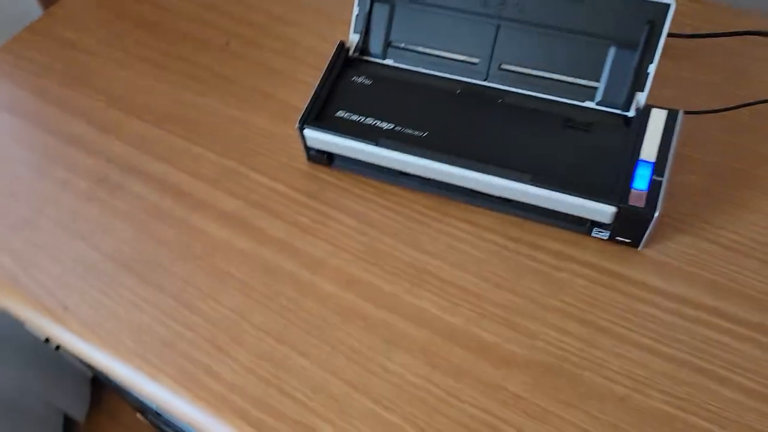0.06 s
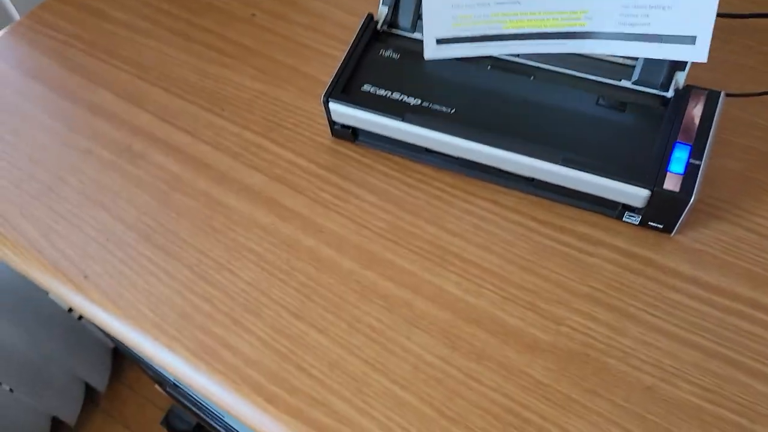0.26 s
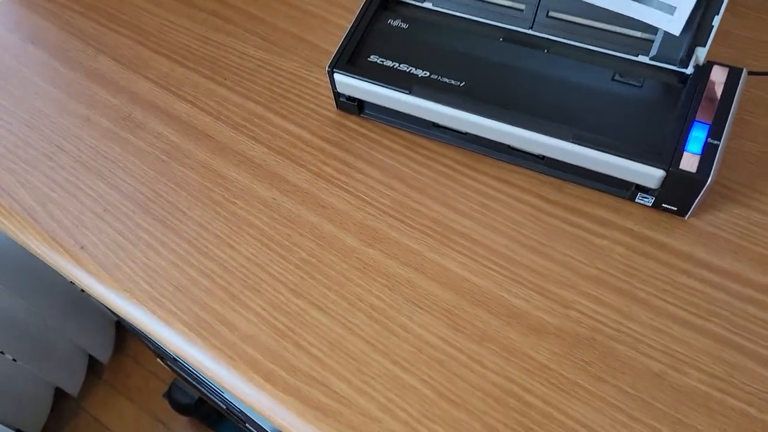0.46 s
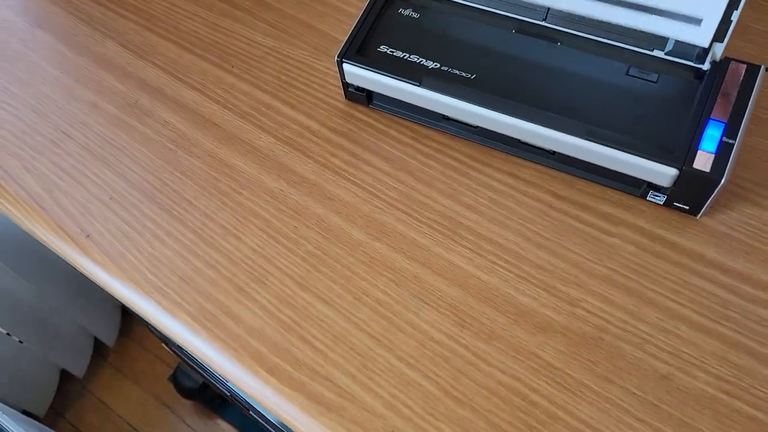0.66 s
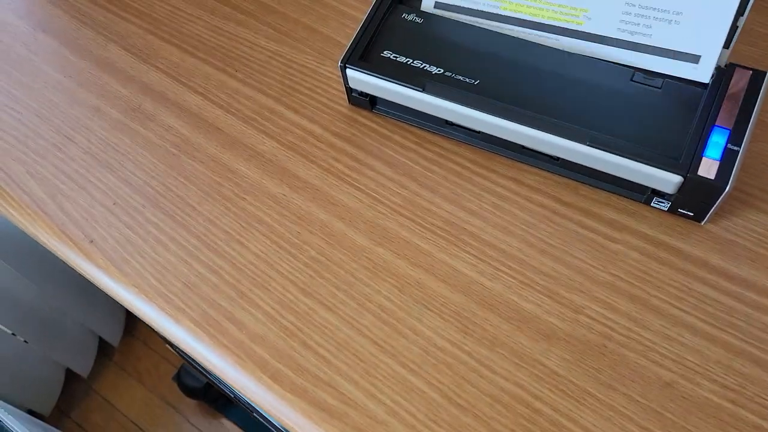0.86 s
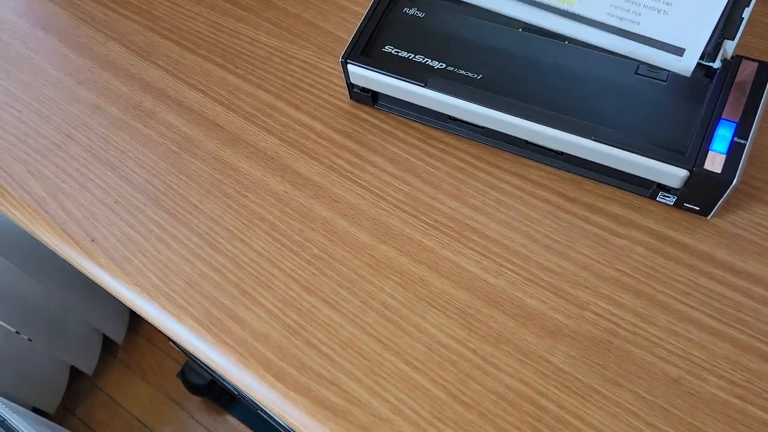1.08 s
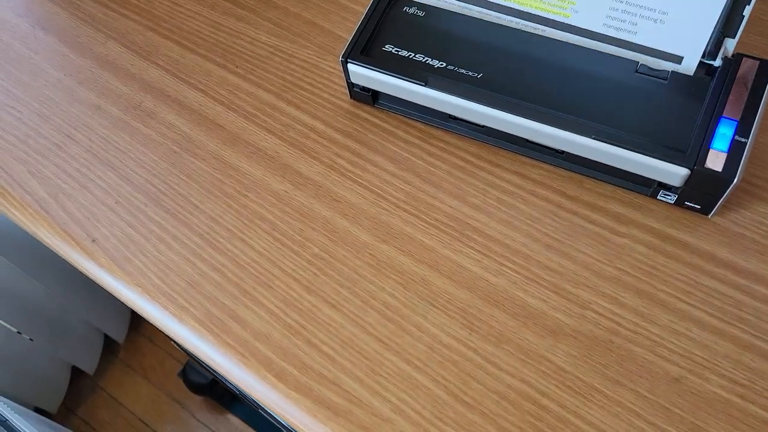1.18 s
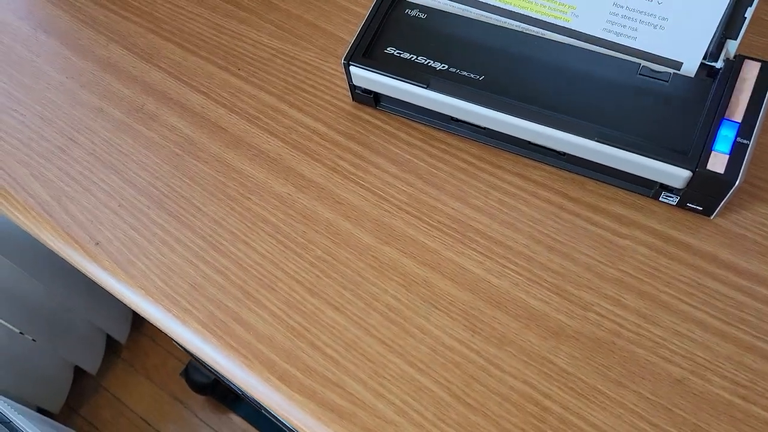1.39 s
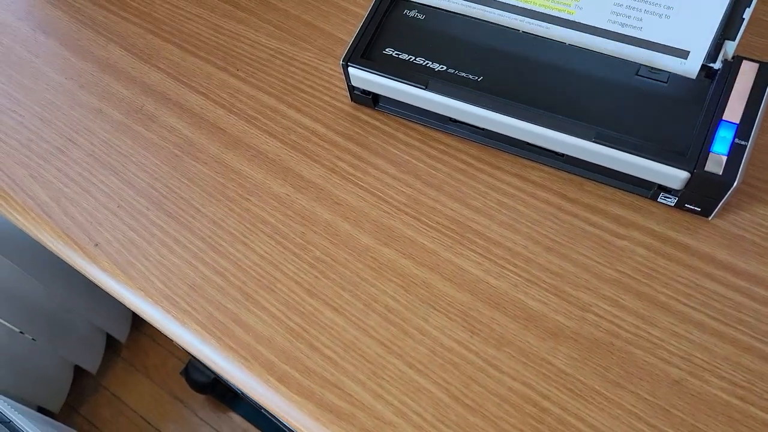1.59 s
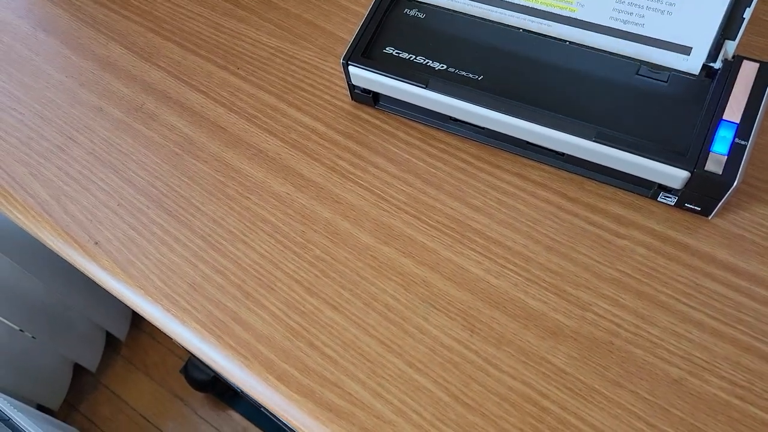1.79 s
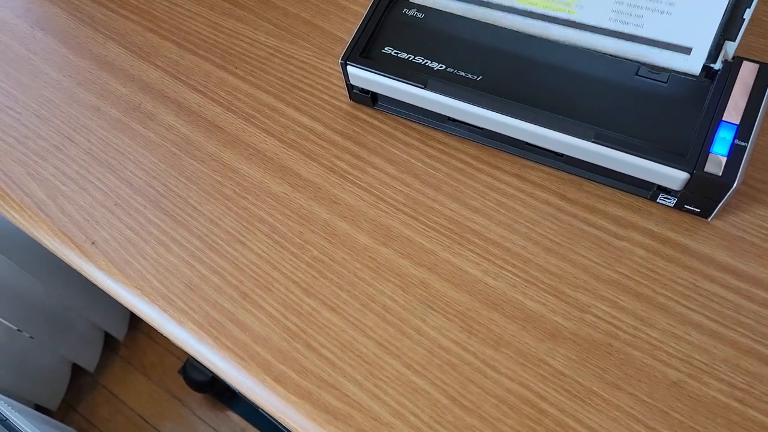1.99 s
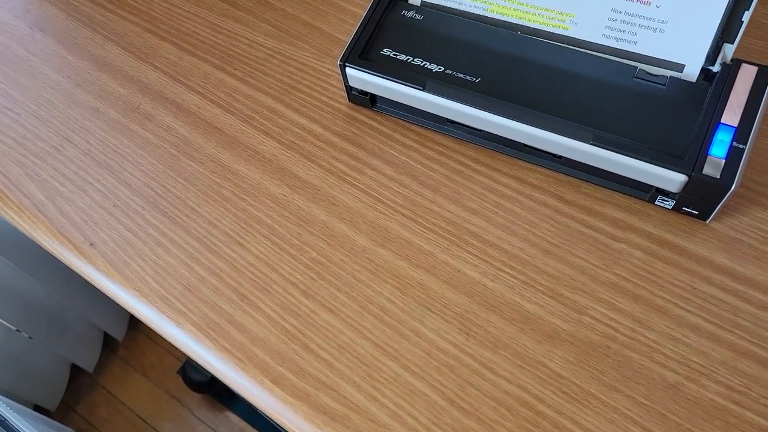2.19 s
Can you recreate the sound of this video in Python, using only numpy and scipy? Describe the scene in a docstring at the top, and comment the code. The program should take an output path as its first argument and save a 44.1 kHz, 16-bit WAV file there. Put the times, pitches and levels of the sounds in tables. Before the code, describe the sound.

Paper sheets are loaded into a scanner's hollow plastic tray, close up in stereo. Faint rubbing over low room rumble, then from 0.2 to 0.45 seconds a brisk scrape and hard clack, loudest near 0.3. Soft rustling and small ticks follow until a crisp papery knock at 1.25. A faint scrape comes around 1.6 to 1.7, then near quiet, with a slight rustle about 2.1.

```python
"""A low rumble and the faint rub of paper come first, in a quiet room before two microphones.
Then a hand drops sheets into the plastic feeder tray of a desk scanner: the stack knocks and scrapes.
Knocks and drag excite decaying modes of the hollow tray; filtered noise makes the paper's snap.
The sheets slide as hiss with fine crackle, delay loops give the room, steady noise the rumble."""
import sys
import numpy as np
from scipy import signal
from scipy.io import wavfile

SR = 44100
rng = np.random.default_rng(int(sys.argv[2]) if len(sys.argv) > 2 else 0)


def generate_wav(signal):
    """Clip the signal to [-1, 1] and save it as 16-bit WAV at the path in sys.argv[1]."""
    frames = np.transpose(np.atleast_2d(signal))
    scaled = np.clip(frames, -1, 1) * 32767
    pcm = np.round(scaled).astype(np.int16)
    wavfile.write(sys.argv[1], SR, pcm)


def boost(x):
    """Linear amplitude factor 10**(x/20) for a level x in decibels (scalar or array-like)."""
    u = np.asarray(x, float) / 20
    return 10 ** u


N = 99225  # samples, 2.25 s

# Modes of the plastic tray. Each row: frequency in Hz, relative level in dB, t60 in seconds.
TRAY_MODES = [(691, -5, 0.058), (850.4, -0.5, 0.02), (1035.4, -9.5, 0.077), (1162, -7.5, 0.071),
              (1349, 1.5, 0.019), (1555.4, 1, 0.03), (1744, 1.5, 0.045), (2103, -5, .03),
              (2386, -3.5, 0.023), (2833, -1, 0.0325), (3196, 3, 0.018), (3863, 7, 0.0067)]
# Modes of hollow body and desk. Each row: frequency in Hz, relative level in dB, t60 in seconds.
BODY_MODES = [(135.9, -4, 0.029), (181, -15, 0.06), (223, -5, 0.064), (353, -7.5, 0.079),
              (444.5, -5.5, 0.076), (578, -7, 0.063)]
# Colour of snapping paper, also of the scrape's hiss. Each row: frequency in Hz, relative level in dB per Hz.
SNAP_SPECTRUM = [(410, -28.5), (700, -6.5), (1750, -9), (2220, 1.5), (4150, -23.5), (4730, -3.5),
                 (6480, -24.5), (7790, -21), (11200, -37.5), (16000, -33)]


def knocks():
    """Each knock rings the tray and the body under it, and the paper snaps as a burst of coloured noise."""
    tray_force = blows(column=1, rows=len(TRAY_MODES), alike=0.53)
    tray = boost(-8.5) * low_cut(ring(tray_force, TRAY_MODES), hz=150, order=1)
    body_force = blows(column=3, rows=len(BODY_MODES), alike=1)
    thud = boost(-5) * low_cut(ring(body_force, BODY_MODES), hz=63, order=2)
    left, right = blows(column=2, rows=1, alike=0.53)[0]
    mid_side = np.array([left + right, left - right]) / 2
    snap = boost(17) * coloured(mid_side, SNAP_SPECTRUM, patchy_db=0)
    return ears(tray + thud) + snap


# Knocks of the stack on the tray. Each row: start in seconds, then relative levels in dB of tray ring,
# paper snap and thud, rattle under the click in dB (held to -10 at most), rattle t60 in seconds (0.2 at most).
KNOCK_ROWS = [(0.1824, -37, -52, -48, -13, 0.028), (0.2617, -17, -22, -57, -22, 0.055),
              (0.3132, -26, -30, -25, -15.5, 0.09), (0.321, -8.5, -14.5, -17.5, -26.5, 0.17),
              (0.4433, -36, -50, -37, -26, 0.01), (0.452, -31, -36.5, -40, -8.5, 0.091),
              (0.532, -44, -62, -49.5, -9.5, 0.099), (0.839, -47, -45.5, -50, -13.5, 0.039),
              (0.8465, -41, -51, -47.5, -8.5, 0.04), (0.895, -50, -51, -42, -10.5, 0.042),
              (0.918, -40, -33, -46, -15.5, 0.11), (1.0638, -38.5, -45.5, -45, -16.5, 0.02),
              (1.2008, -34, -24.5, -41.5, -24, 0.11), (1.2273, -29, -44, -44.5, -12, 0.18),
              (1.2454, -16.5, -9.5, -30, -31, 0.08), (1.5745, -55.5, -44.5, -55, -20.5, 0.08),
              (1.604, -46, -43, -41, -23, 0.047), (1.612, -50, -45.5, -57, -24, 0.023),
              (1.648, -54, -41, -45, -21, 0.031), (1.669, -69, -66, -50, -10, 0.23),
              (2.129, -48.5, -50.5, -53, -5, 0.2), (2.144, -56, -42, -45, -16, 0.14)]


def blows(column, rows, alike):
    """Forces of the knocks: a click, a short crack and a dying rattle of noise, scattered in strength."""
    crack_db, crack_t60_s = -9, 0.003
    mode_scatter_db, side_scatter_db = 2.5, 1.5
    out = np.zeros((rows, 2, N + SR))
    t = np.arange(SR // 6) / SR
    for knock in KNOCK_ROWS:
        start_s, rattle_db, rattle_t60_s = knock[0], min(knock[4], -10), np.clip(knock[5], 0.004, 0.2)
        noise = rng.standard_normal((2, len(t)))
        noise[1] = alike * noise[0] + np.sqrt(1 - alike ** 2) * noise[1]
        rattle = boost(rattle_db - 60 * t / rattle_t60_s)
        crack = boost(crack_db - 60 * t / crack_t60_s)
        force = (rattle + crack) * noise
        force[:, 0] = 1  # the click
        scatter = side_scatter_db * rng.standard_normal((rows, 2, 1))
        if rows > 1:
            scatter = scatter + mode_scatter_db * rng.standard_normal((rows, 1, 1))
        i = int(start_s * SR)
        out[..., i:i + len(t)] += force * boost(knock[column] + scatter)
    return out[..., :N]


# Strokes of the stack's edge along the tray, one list a stroke.
# Each row: time in seconds, relative level of the tray in dB, relative level of the body under it in dB.
SCRAPE_STROKES = [
    [(0.17, -53.5, -68), (0.184, -38, -47), (0.194, -39.5, -49.5), (0.214, -25.5, -35), (0.228, -22, -46),
     (0.244, -26.5, -41), (0.262, -21.5, -35.5), (0.294, -34, -42), (0.31, -53, -31)],
    [(0.335, -20.5, -30.5), (0.361, -37, -49), (0.383, -28.5, -36.5), (0.419, -52, -50), (0.44, -52, -35.5)],
    [(1.255, -33, -30), (1.273, -48, -37), (1.305, -73, -50), (1.347, -55.5, -50), (1.42, -70, -73)],
    [(1.59, -59, -60.5), (1.614, -42.5, -45), (1.642, -51, -56), (1.648, -47.5, -64), (1.672, -53, -48),
     (1.698, -52, -53.5), (1.728, -60, -55), (1.776, -69.5, -63), (1.8, -81, -70.5)],
]
# Resonances that the dragged edge brings out. Each row: frequency in Hz, relative level in dB, t60 in seconds.
DRAGGED_MODES = [(620, -15, 0.016), (749, -8, 0.012), (1001, -4.5, 0.017), (1094, -3, 0.036),
                 (1210, -4, 0.019), (1414, -3, 0.011), (1760, -0.5, 0.0067), (2115, -5, 0.014),
                 (2570, -7, .015), (3276, -10, 0.0093)]
# Body resonances under the drag. Each row: frequency in Hz, relative level in dB, t60 in seconds.
HOLLOW_MODES = [(321, 0.5, .07), (410, 0.5, 0.047)]


def scrape():
    """Dense slips of the paper edge drive the resonances of tray and body."""
    # silent outside the strokes
    tray_level, body_level = sum(boost(np.array(in_time(rows, -200))) for rows in SCRAPE_STROKES)
    slips = grains(per_s=4000, spread_db=2.5)
    slips[1] = 0.82 * slips[0] + 0.656 * slips[1]  # partly alike on both sides
    tray = rms_one(low_cut(ring([slips] * len(DRAGGED_MODES), DRAGGED_MODES), hz=450, order=4))
    body = rms_one(low_cut(ring([slips] * len(HOLLOW_MODES), HOLLOW_MODES), hz=230, order=4))
    hiss = boost(-23.5) * rms_one(coloured(slips, SNAP_SPECTRUM, patchy_db=0))
    judder = boost(1.5 * drift(rate_hz=60))
    return judder * (ears(tray_level * tray + body_level * body) + tray_level * hiss)


# Sheets sliding on each other. Each row: time in seconds, level of the rub in dB, level of its treble band in dB.
SLIDE_LEVELS = [(0.0, -71.5, -98), (0.035, -51, -69.5), (0.17, -57.5, -61), (0.21, -84, -73),
                (0.26, -32, -83), (0.3, -45, -51), (0.345, -51, -42), (0.39, -48, -68), (0.44, -44, -50.5),
                (0.48, -60, -56.5), (0.51, -47, -68), (0.54, -48.5, -52), (0.58, -56, -70.5),
                (0.61, -56, -57.5), (0.64, -61.5, -80.5), (0.71, -64.5, -65.5), (0.73, -52, -57),
                (0.77, -53.5, -57.5), (0.81, -55, -61), (0.85, -45, -49.5), (0.91, -52.5, -66),
                (0.94, -55.5, -60.5), (0.99, -58, -84), (1.05, -49.5, -64.5), (1.09, -56.5, -76),
                (1.13, -51.5, -60.5), (1.19, -47, -74), (1.22, -47, -60.5), (1.28, -45, -65.5),
                (1.42, -65, -86.5), (1.56, -86.5, -100), (1.59, -56.5, -62), (1.67, -61.5, -65),
                (1.71, -66, -78.5), (1.78, -68.5, -84), (1.88, -74.5, -90), (1.98, -66, -78),
                (2.04, -69.5, -79.5), (2.08, -60, -65), (2.14, -53.5, -58), (2.18, -57.5, -76),
                (2.25, -63.5, -62.5)]
# Colour of the rubbing sheets. Each row: frequency in Hz, relative level in dB per Hz.
SHEET_SPECTRUM = [(350, -35), (600, 19), (853, 11), (933, -12), (1090, 20), (1720, 18), (2160, 10),
                  (3680, 19), (6780, 4.5), (9000, -3), (11700, -71), (19800, -120)]
# Colour of the treble band. Each row: frequency in Hz, relative level in dB per Hz.
TREBLE_SPECTRUM = [(4410, -2), (7500, 4.5), (8410, -7.5), (14100, -3), (16000, -13)]


def slide():
    """Sheets rub: hiss mixed with fine crackle, its treble band on a level curve of its own."""
    level_db, treble_db = in_time(SLIDE_LEVELS)
    crackle_share = 0.21
    crackle = grains(per_s=2700, spread_db=6.5)
    hiss = rng.standard_normal((2, N))
    rub = crackle_share * crackle + (1 - crackle_share) * hiss
    rub = rub * boost(1.54 * drift(rate_hz=26.7))
    sheets = rms_one(coloured(rub, SHEET_SPECTRUM, patchy_db=1))
    treble = rms_one(coloured(rub, TREBLE_SPECTRUM, patchy_db=0))
    return boost(level_db) * sheets + boost(treble_db) * treble


def room(x):
    """Eight feedback delays a side, duller on every round, dying by 60 dB in t60_s at low frequencies."""
    t60_s, wall_cut_hz = 0.37, 5130
    out = np.zeros((2, N))
    dull = np.exp(-2 * np.pi * wall_cut_hz / SR)
    lags = (rng.uniform(0.011, 0.04, 16) * SR).astype(int)
    for k, lag in enumerate(lags):
        direct = x[k % 2]
        loop, state = direct.copy(), [0.]
        gain = boost(-60 * lag / SR / t60_s)
        for i in range(lag, N, lag):
            back, state = signal.lfilter([gain * (1 - dull)], [1, -dull], loop[i - lag:i], zi=state)
            loop[i:i + lag] += back[:N - i]
        out[k % 2] += (loop - direct) * (-1) ** (k // 2)  # echoes only
    return out


# Colour of the low rumble. Each row: frequency in Hz, relative level in dB per Hz.
RUMBLE_SPECTRUM = [(15, -45), (25, -29.5), (49, 0.5), (120, -25), (166, -26.5), (363, -8.5), (489, -37),
                   (531, -24), (641, -33), (796, -30), (2550, -56.5), (5000, -49), (16000, -78.5)]


def rumble():
    """Noise, mostly low, with a slight flicker in each band."""
    noise = rng.standard_normal((2, N))
    return boost(-52.5) * rms_one(coloured(noise, RUMBLE_SPECTRUM, patchy_db=1))


def ring(force, modes):
    """A force per mode sets each mode, a decaying resonator, ringing, signs alternating."""
    out = 0
    for k, (push, (hz, level_db, t60)) in enumerate(zip(force, modes)):
        r = boost(-60 / (t60 * SR))  # decay per sample
        w = 2 * np.pi * hz / SR
        tone = signal.lfilter([0, np.sin(w)], [1, -2 * r * np.cos(w), r * r], push + 1e-18)
        out = out + (-1) ** k * boost(level_db) * tone
    return out


def low_cut(x, hz, order):
    """Small panels radiate no bass."""
    return signal.sosfilt(signal.butter(order, hz, "high", fs=SR, output="sos"), x)


def ears(pair):
    """The right microphone hears the tray a little earlier and louder."""
    right_leads_s, left_db = 0.00016, -3.5
    n = np.arange(N)
    left = boost(left_db) * pair[0]
    right = np.interp(n + right_leads_s * SR, n, pair[1])
    return np.array([left, right])


def grains(per_s, spread_db):
    """Random clicks of uneven size, two unrelated rows; rms 1."""
    sizes = boost(spread_db * np.minimum(rng.exponential(1, (2, N)), 5))
    signs = rng.choice([-1, 1], (2, N))
    return rms_one(sizes * signs * (rng.random((2, N)) < per_s / SR))


# Likeness of the two microphones. Each row: frequency in Hz, likeness from 0 to 1 for an unrelated mid and side.
STEREO_LIKENESS = [(30, 1), (90, 0.94), (200, .9), (550, 0.2), (1650, 0.13), (5000, .2), (15000, .2)]
# Balance of the two microphones. Each row: frequency in Hz, left minus right in dB.
STEREO_TILT = [(60, -3.5), (240, -2), (950, -4.5), (3770, -3.5), (15000, 0.5)]
EDGES = 22 * 2 ** np.arange(0, 9.7, 0.5)  # half-octave band edges in Hz


def coloured(pair, spectrum, patchy_db):
    """Half-octave bands of a mid and a side signal, each with its level, flicker, likeness and balance."""
    out = 0
    for k, (low, high) in enumerate(zip(EDGES, EDGES[1:])):
        hz = np.sqrt(low * high)
        flicker = patchy_db * drift(rate_hz=30)
        if not spectrum[0][0] < hz < spectrum[-1][0]:
            continue
        band = signal.butter(2, [low, high], "band", fs=SR, output="sos")
        mid, side = signal.sosfilt(band, pair)
        alike = np.clip(at_hz(STEREO_LIKENESS, hz), 0, 1)
        balance_db = at_hz(STEREO_TILT, hz) * np.array([[0.5], [-0.5]])
        gain = boost(at_hz(spectrum, hz) + flicker + balance_db)
        stereo = np.sqrt(1 + alike) * mid + np.sqrt(1 - alike) * side * [[1], [-1]]
        out = out + (-1) ** k * gain * stereo
    return out


def drift(rate_hz):
    """Slow random curve of spread 1: noise through two equal low-pass poles, drawn every 40 samples."""
    r = np.exp(-2 * np.pi * rate_hz * 40 / SR)
    noise = rng.standard_normal(N // 40 + 2002)
    slow = signal.lfilter([1], [1, -2 * r, r * r], noise)[2000:]  # skips the filter's start
    return np.interp(np.arange(N) / 40, np.arange(len(slow)), rms_one(slow - slow.mean()))


def rms_one(x):
    """Scales to unit rms."""
    return x / np.sqrt(np.mean(x ** 2) + 1e-20)


def in_time(rows, outside=None):
    """Curve columns at every sample; outside replaces the end values beyond the rows."""
    s, *columns = np.transpose(rows)
    return [np.interp(np.arange(N) / SR, s, c, outside, outside) for c in columns]


def at_hz(points, hz):
    """Reads a spectrum on a log frequency axis."""
    point_hz, values = np.transpose(points)
    return np.interp(np.log(hz), np.log(point_hz), values)


def scene():
    """Paper and tray in the room, over the rumble."""
    near = knocks() + scrape() + slide()
    return near + boost(-18.5) * room(near) + rumble()


def band_limit(x):
    """A steep low-pass at the top of the band."""
    return signal.sosfilt(signal.butter(12, 16830, fs=SR, output="sos"), x)


def record(dry):
    """Peaks are rounded smoothly below a ceiling of full scale times 0.95."""
    peak_top = 0.95
    mix = peak_top * np.tanh(dry / peak_top)
    return band_limit(mix)


dry = scene()
out = record(dry)
generate_wav(out)
```